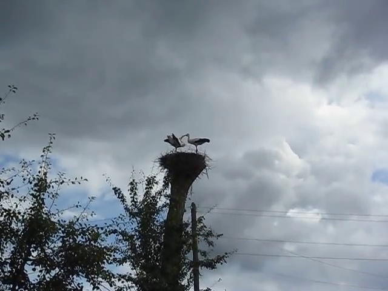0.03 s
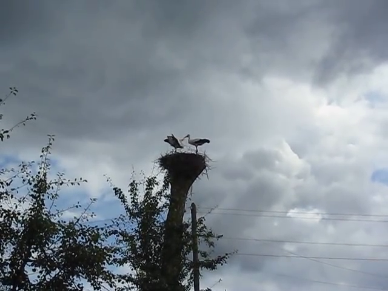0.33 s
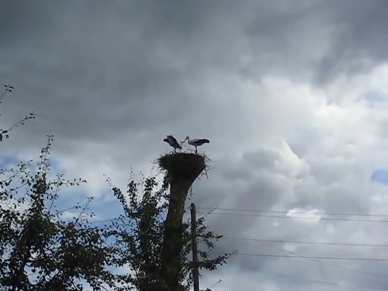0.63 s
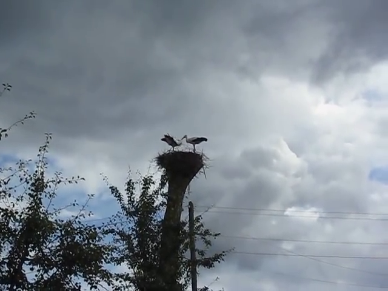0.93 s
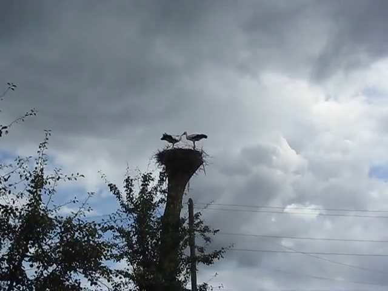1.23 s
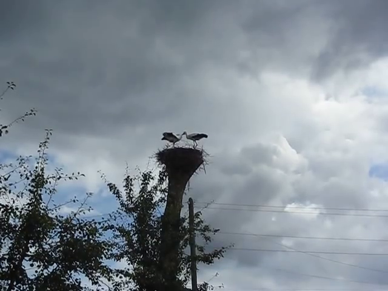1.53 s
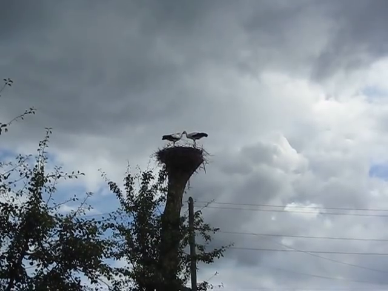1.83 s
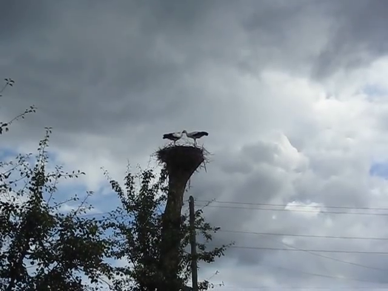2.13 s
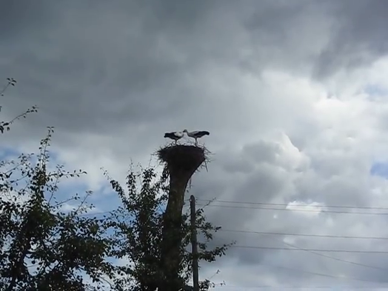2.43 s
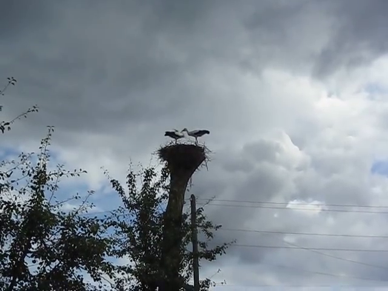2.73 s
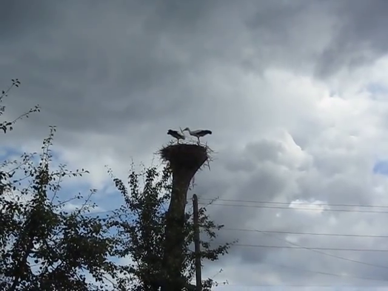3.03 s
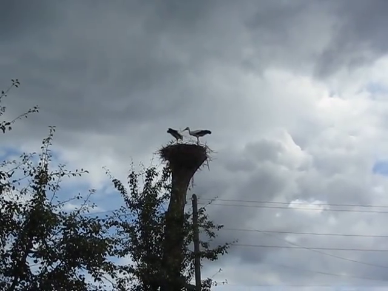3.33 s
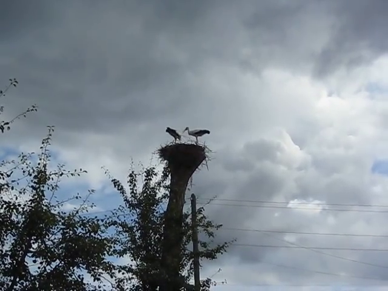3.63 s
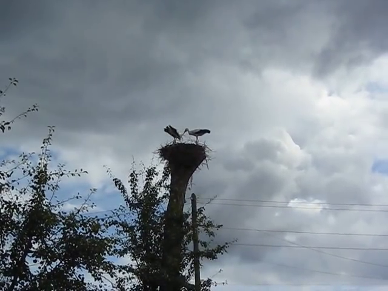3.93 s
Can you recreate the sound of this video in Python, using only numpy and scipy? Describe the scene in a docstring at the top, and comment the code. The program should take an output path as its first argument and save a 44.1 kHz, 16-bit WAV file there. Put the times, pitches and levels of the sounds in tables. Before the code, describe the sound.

Two storks clatter their bills outdoors, the wooden clacks echoing slightly. One is bright, sharp and uneven, continuing throughout. The other is hollow and even, about eight clacks a second, swelling by 1 second and dropping away near 3.3 seconds. A faint, high cricket rasp grows a little from 2 seconds. Quiet air hisses underneath, with soft wind puffs on the microphone, clearest around 1.7 seconds.

```python
"""Storks clattering on a high nest

Two storks clatter their bills, one evenly and hollow, the other brighter and out of step.
Each clack rings the bill and the throat pouch, bounces off the ground and comes back from the yard.
A bush cricket rasps its wings near by, over faint outdoor air and puffs of wind on the microphone."""
import sys
import numpy as np
from scipy import signal
from scipy.fft import rfft, irfft
from scipy.io import wavfile
from scipy.ndimage import uniform_filter1d

SR = 44100
rng = np.random.default_rng(int(sys.argv[2]) if len(sys.argv) > 2 else 0)


def wrap_up_sound(samples):
    """Save the sound to the file named by the first command line argument, as 16-bit audio."""
    columns = np.atleast_2d(samples).T
    # keep every value between -1 and 1, then stretch to whole-number steps
    tamed = np.clip(columns, -1, 1)
    steps = np.round(tamed * 32767).astype(np.int16)
    wavfile.write(sys.argv[1], SR, steps)


N = 4 * SR


def amp(db):
    return 10 ** (np.asarray(db) / 20)


def unit_rms(x):
    return x / np.sqrt(np.mean(x ** 2) + 1e-20)


def curve(points, t):
    return np.interp(t, *np.transpose(points))


def coloured_noise(size, points):
    """White noise filtered by (Hz, dB) points."""
    hz, db = np.transpose(points)
    f = np.fft.rfftfreq(size, 1 / SR)
    gain = amp(np.interp(np.log(f + 1), np.log(hz), db))
    return irfft(rfft(rng.standard_normal(size)) * gain, size)


def add(mix, start_s, sound):
    part = mix[max(round(start_s * SR), 0):][:len(sound)]
    part += sound[:len(part)]


def impulse_response(gain):
    """Minimum-phase response with this gain spectrum."""
    log_gain = np.log(np.maximum(np.r_[gain, gain[-2:0:-1]], 1e-4 * gain.max()))
    return np.fft.ifft(np.exp(np.conj(signal.hilbert(log_gain)))).real[:len(gain)]


def resonate(x, hz, width_hz):
    """Steep resonance; hz may vary per sample."""
    carrier = np.exp(2j * np.pi * np.cumsum(hz * np.ones(len(x))) / SR)
    r = np.exp(-np.pi * width_hz / SR)
    return (carrier * signal.lfilter([(1 - r) ** 2], [1, -2 * r, r * r], x / carrier)).real


def bell_band(f, hz, octaves):
    return np.exp(-.5 * (np.log2(f / hz) / octaves) ** 2)


# Outdoor air spectrum. Each row: frequency in Hz, relative level in dB.
AIR_SPECTRUM = [(25, -6), (60, -4), (130, -2), (300, 0.5), (560, 2.5), (750, 5.5), (1000, 4.5), (1300, 1),
                (1600, -0.5), (2000, 0), (2450, 0.5), (2900, -5.5), (3600, -6.5), (7000, -11.5),
                (9000, -8.5), (12000, -18.5), (18000, -26.5)]


def air(level_db=-45, patch_db=1.4):
    """Soft hiss whose level drifts in patches of time and frequency."""
    spectrogram = signal.stft(coloured_noise(N, AIR_SPECTRUM), nperseg=1024)[2]
    patches = uniform_filter1d(rng.standard_normal(spectrogram.shape), size=12, axis=0)
    patches = unit_rms(uniform_filter1d(patches, size=8, axis=1))
    hiss = signal.istft(spectrogram * amp(patch_db * patches), nperseg=1024)[1][:N]
    return amp(level_db) * unit_rms(hiss)


# Wing stroke rate. Each row: time in seconds, strokes per second.
STROKE_RATE = [(0, 30.4), (.9, 30.5), (1.1, 29.8), (3.3, 29.8), (4, 28)]
# Cricket loudness. Each row: time in seconds, level in dB.
CRICKET_LEVEL = [(0, -51.5), (.8, -45.5), (1.2, -47.5), (1.6, -45), (2.1, -39.5), (2.9, -42.5),
                 (3.2, -40.5), (3.6, -42), (4, -41)]


def cricket(first_stroke_s=.023, rise_s=.0058, fall_s=.0041, wing_hz=8780, sag_hz_per_s=25000):
    """Each wing stroke swells, sags in pitch and stops; a higher rasp leads it."""
    rasp_hz, rasp_db, lead_s, rasp_half_width_s = 10900, -10.5, .0033, .0059
    t = np.arange(N) / SR
    rate = curve(STROKE_RATE, t)
    strokes = np.cumsum(rate) / SR - first_stroke_s * rate[0]
    from_peak_s = (strokes - np.round(strokes)) / rate
    wing = resonate(rng.standard_normal(N), wing_hz - sag_hz_per_s * from_peak_s, width_hz=970)
    wing_swell = np.exp(-(from_peak_s / np.where(from_peak_s < 0, rise_s, fall_s)) ** 2)
    rasp = rng.standard_normal(N)
    for _ in range(2):
        rasp = resonate(rasp, rasp_hz, width_hz=3800)
    rasp_swell = amp(rasp_db) * np.exp(-((from_peak_s + lead_s) / rasp_half_width_s) ** 2)
    return amp(curve(CRICKET_LEVEL, t)) * (unit_rms(wing) * wing_swell + unit_rms(rasp) * rasp_swell)


def tuned(modes, scale, gain_db):
    """Modes with frequencies scaled and levels shifted."""
    return [(pitch * scale, width_hz, db + gain_db) for pitch, width_hz, db in modes]


def clack(modes, snap_db, pitch_spread=.014, spread_db=1, ripple_db=4):
    """The mandibles snap shut and ring the pouch and the bill, slightly differently each time."""
    low_cut_hz, body_top_hz, distance_cut_hz = 527, 3036, 10200
    snap_low_hz, snap_high_hz = 2510, 4810
    f = np.fft.rfftfreq(4096, 1 / SR) + 1
    body_power = np.zeros(len(f))
    for hz, width_hz, db in modes:
        db += spread_db * rng.standard_normal()
        hz *= 1 + pitch_spread * rng.standard_normal()
        body_power += amp(db) ** 2 / (1 + ((f * f - hz * hz) / (f * width_hz)) ** 2)
    body_power /= 1 + (f / body_top_hz) ** 6
    snap_power = amp(snap_db) ** 2 / (1 + (f / snap_high_hz) ** 4) / (1 + (snap_low_hz / f) ** 4)
    ripple = uniform_filter1d(uniform_filter1d(rng.standard_normal(len(f)), size=20), size=20)
    ripple_gain = unit_rms(amp(ripple_db * np.minimum(unit_rms(ripple), 1)))
    band = 1 / (1 + (low_cut_hz / f) ** 5) / (1 + (f / distance_cut_hz) ** 6)
    return impulse_response(np.sqrt((body_power + snap_power * ripple_gain ** 2) * band))


# Tree echoes. Each row: delay in seconds, level in dB, smear in seconds, centre in Hz, width in octaves.
TREE_ECHOES = [(.019, -22, 0.013, 1400, 3.5), (.024, -22.5, 0.00097, 1590, 0.94),
               (.036, -27, .005, 1700, 1)]
# Reverb tail spectrum. Each row: frequency in Hz, relative level in dB.
TAIL_SPECTRUM = [(200, -10), (700, 2), (1100, -2.5), (1550, -1), (2000, 4.5), (2450, 2.5), (3500, 0.5),
                 (9000, -3)]


def yard(x, size=16384):
    """Ground bounce and slap, plus diffuse echoes and a faint reverb tail that vary slightly per clack."""
    ground_s, ground_gain, slap_s, slap_db = .00255, .65, .0745, -12
    tail_db, tail_rise_s, tail_t60_s = -21, .0047, .55
    t, f = np.arange(size) / SR, np.fft.rfftfreq(size, 1 / SR) + 1
    tail = coloured_noise(size, TAIL_SPECTRUM) * amp(-60 * t / tail_t60_s)
    tail *= np.clip(t / tail_rise_s, 0, 1)
    response = amp(tail_db) * tail / np.linalg.norm(tail)
    response[0] += 1  # direct path
    for delay_s, db, smear_s, hz, octaves in TREE_ECHOES:
        scatter = rng.standard_normal(size) * (t >= delay_s) * np.exp(-abs(t - delay_s) / smear_s)
        band = bell_band(f, hz, octaves)
        echo = rfft(scatter) * band
        response += amp(db) * irfft(echo * np.linalg.norm(band) / np.linalg.norm(echo), size)
    bounced = x.copy()
    add(bounced, ground_s, ground_gain * x)
    out = signal.fftconvolve(bounced, response)
    slap = impulse_response(bell_band(f, hz=1946, octaves=.26))
    add(out, slap_s, amp(slap_db) * signal.fftconvolve(x, slap))
    return out


# Bright stork's clacks. Each row: start in seconds, pouch, knock and ring levels in dB,
# ring pitch in Hz, snap level in dB.
BRIGHT_CLACKS = [(0.0671, 1.5, -17.0, -25.0, 2420.0, -11.5), (0.2268, 0.5, -11, 3, 2800, -3.0),
                 (0.3795, 16, 19.5, 20.5, 2700, -2.5), (0.5114, 1, -3.0, -8, 2700, -26.0),
                 (0.5258, 15, 19, 24.5, 2740, 1.5), (0.6587, 12.5, 18.5, 20.5, 2720, 1),
                 (0.774, 3, -17.0, -13.0, 2710.0, -8.0), (0.7899, 3.0, 1.0, -6, 2740.0, -28.0),
                 (0.8914, 6, -5.0, -17.0, 2670, -1), (1.003, 16, 16, 5.0, 2710.0, -8.5),
                 (1.1118, 14.5, 12.0, 0.0, 2670.0, -10), (1.2213, 15.0, 13, 3, 2550.0, -6.5),
                 (1.3293, 16, 14.0, 8.0, 2630.0, -8), (1.439, 18, 6, 7, 2670.0, -14),
                 (1.5469, 16.5, 13.0, 6.0, 2700.0, -16), (1.6567, 19, 7, 7, 2770.0, -19.0),
                 (1.7669, 4.5, 9.0, -1, 2380.0, -13), (1.8858, 7.5, 9.0, 10, 2680.0, -6.5),
                 (2.0048, 5.0, 9, 5, 2710.0, -7.0), (2.1267, 14, 7.0, -8.0, 2680.0, -14),
                 (2.2407, 14, 12, -2.0, 2650.0, -13), (2.3575, 15.5, 13, 9, 2680.0, -11),
                 (2.4749, 13, 16, 7, 2680.0, -7.0), (2.5922, 13.0, 17, 17, 2680.0, -6),
                 (2.7139, 17, 18, 9, 2640, -4.0), (2.8365, 16, 19, 14, 2720, -4),
                 (2.9647, 16.5, 18.5, 14, 2540.0, -6), (3.0968, 16, 11, 18.5, 2360, 0),
                 (3.2337, 13.0, 13.5, 19, 2380.0, -1), (3.3638, -2, -6.0, -1, 2400, -21),
                 (3.374, 18, 0, 20.0, 2360, -1), (3.506, 9, -6.0, 3, 2380.0, -18.0),
                 (3.5134, 18.5, -8, 17, 2470, -10), (3.6446, 2, -11.0, 4.0, 2380.0, -19.0),
                 (3.6533, 14.5, -7, 22.5, 2507, -10), (3.7838, 5, -8.0, 5, 2370, -19.0),
                 (3.796, 14, -3, 25.5, 2544, -2.5), (3.926, 4, -8, 1, 2460, -17.0),
                 (3.9443, 14.5, -3, 25, 2645, -2)]
# Pouch and bill-knock modes. Each row: base frequency in Hz, width in Hz, relative level in dB.
BRIGHT_POUCH = [(761, 230, -4), (995, 62, 3.5)]
BRIGHT_KNOCK = [(1858, 102, 1), (3220, 100, -4)]
# Bill ring partials. Each row: multiple of the ring pitch, width in Hz, relative level in dB.
BRIGHT_RING = [(0.998, 177, 0.5), (1.24, 314, -10.5), (1.52, 348, -19.5), (1.78, 347, -9.5)]
# Pouch tightening. Each row: time in seconds, pitch factor.
POUCH_PITCH = [(.65, 0.85), (1, 1.02), (3, 1.11), (3.5, 1)]


def bright_stork():
    """Uneven clatter with a sharp snap; the pouch tightens and rises in pitch, then eases."""
    out = np.zeros(N)
    for start_s, pouch_db, knock_db, ring_db, ring_hz, snap_db in BRIGHT_CLACKS:
        pouch = tuned(BRIGHT_POUCH, curve(POUCH_PITCH, start_s), pouch_db)
        knock = tuned(BRIGHT_KNOCK, 1, knock_db)
        ring = tuned(BRIGHT_RING, ring_hz, ring_db)
        add(out, start_s, yard(clack(pouch + knock + ring, snap_db)))
    return out


# Wind puffs. Each row: peak time in seconds, half-width in seconds, level in dB.
PUFFS = [(0.175, 0.11, -56), (0.416, 0.12, -54), (0.664, 0.048, -51.5), (0.91, 0.062, -53),
         (1.1, 0.016, -53), (1.405, 0.1, -52.5), (1.686, 0.016, -42), (1.73, 0.015, -42.5),
         (1.775, 0.016, -44), (2.46, 0.045, -61)]
# Puff spectrum. Each row: frequency in Hz, relative level in dB.
PUFF_SPECTRUM = [(20, -40), (60, 2.5), (150, 0), (250, -2), (500, -33), (2000, -65)]


def wind():
    """Short low puffs on the microphone."""
    t = np.arange(N) / SR
    gusts = sum(amp(db) * np.exp(-((t - peak_s) / half_s) ** 2) for peak_s, half_s, db in PUFFS)
    return gusts * unit_rms(coloured_noise(N, PUFF_SPECTRUM))


# Hollow stork's clacks. Each row: start in seconds, knock level in dB, ring level in dB re the knock.
HOLLOW_CLACKS = [(0.1914, 13.5, -15), (0.3067, 8.5, -29), (0.4313, 11, -21), (0.5618, 15.5, -13),
                 (0.6869, 18.5, -14), (0.8096, 20.5, -10.5), (0.938, 24, -9), (1.0647, 26, -7.5),
                 (1.189, 26, -5), (1.315, 26.5, -2), (1.4423, 27, -3.5), (1.5692, 27, -5.5),
                 (1.6948, 26, -5), (1.8222, 26.5, -2), (1.951, 26.5, -3.5), (2.0797, 26.5, -2),
                 (2.2066, 26.5, -4), (2.3349, 26.5, -3), (2.4614, 26, -2), (2.5887, 26.5, -2.5),
                 (2.7172, 26, 0), (2.8456, 27, -3.5), (2.975, 26, -3), (3.103, 24.5, -9.5),
                 (3.2156, 22, -14), (3.3415, 9.5, -13), (3.8891, 18, -5.5)]
# Pouch and bill-knock modes. Each row: frequency in Hz, width in Hz, relative level in dB.
HOLLOW_POUCH = [(708, 88.8, 0)]
HOLLOW_KNOCK = [(1434, 95, -1), (1630, 123, -2), (3010, 130, -9.5), (5230, 500, -19.5)]
# Bill ring partials. Each row: multiple of the ring pitch, width in Hz, relative level in dB.
HOLLOW_RING = [(1, 168, 1), (1.299, 280, -27.5), (1.77, 198, -13)]


def hollow_stork(ring_hz=2405, pouch_rel_db=1.47, snap_rel_db=-30.5):
    """Even clatter, about eight clacks a second, with a strong pouch resonance and little snap."""
    out = np.zeros(N)
    for start_s, knock_db, ring_rel_db in HOLLOW_CLACKS:
        pouch = tuned(HOLLOW_POUCH, 1, knock_db + pouch_rel_db)
        knock = tuned(HOLLOW_KNOCK, 1, knock_db)
        ring = tuned(HOLLOW_RING, ring_hz, knock_db + ring_rel_db)
        add(out, start_s, yard(clack(pouch + knock + ring, knock_db + snap_rel_db)))
    return out


def scene():
    return (air() + cricket() + bright_stork() + wind() + hollow_stork())[None]


def record(dry):
    """Steep low-pass at 18.5 kHz."""
    lowpass = signal.firwin(511, 18500, window=("kaiser", 9), fs=SR)
    return signal.oaconvolve(dry, lowpass[None], "same")


dry = scene()
out = record(dry)
wrap_up_sound(out)
```